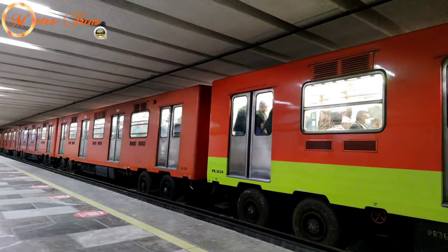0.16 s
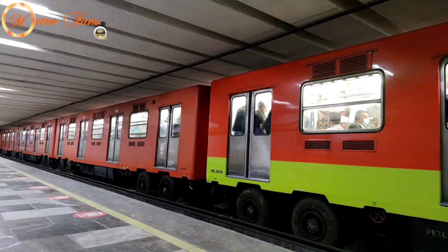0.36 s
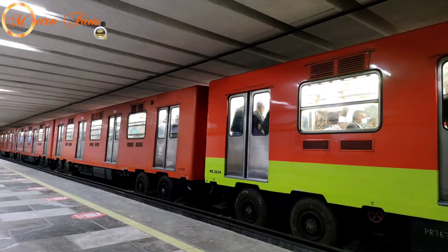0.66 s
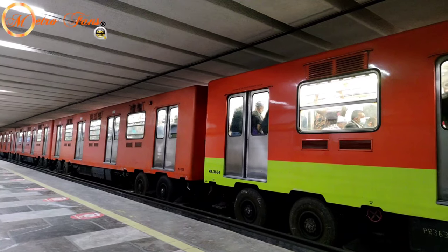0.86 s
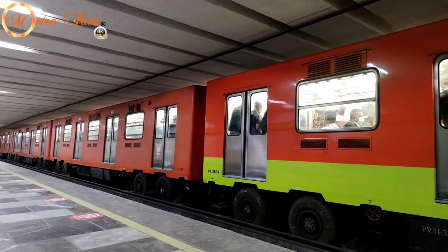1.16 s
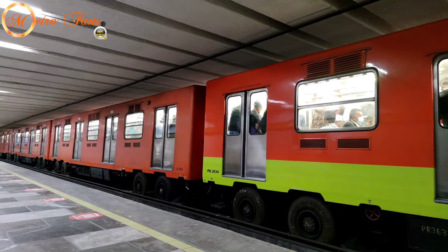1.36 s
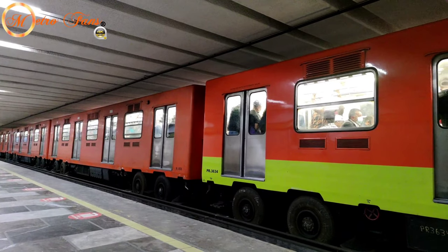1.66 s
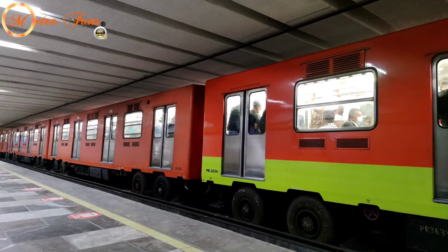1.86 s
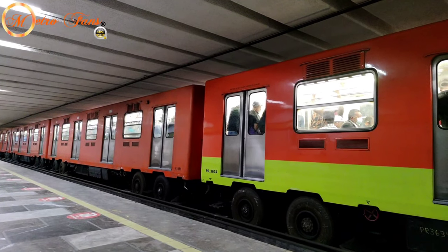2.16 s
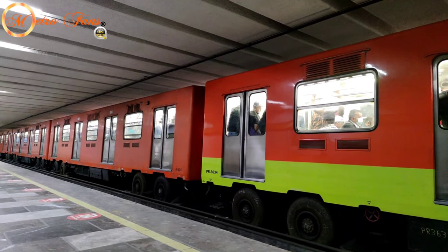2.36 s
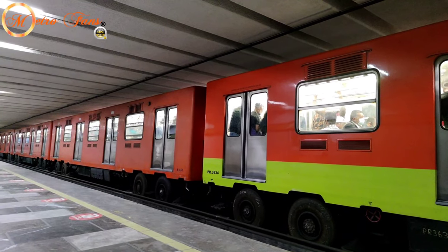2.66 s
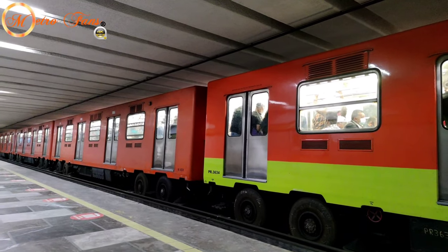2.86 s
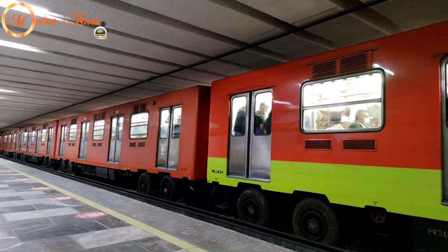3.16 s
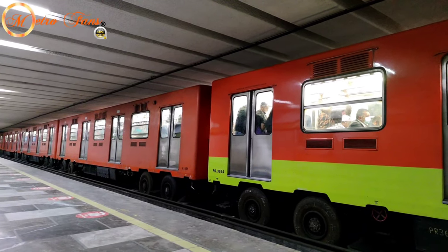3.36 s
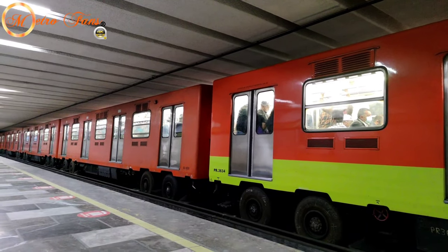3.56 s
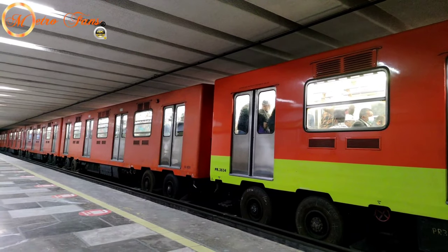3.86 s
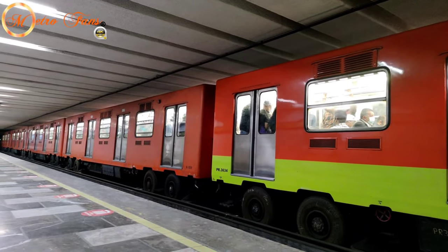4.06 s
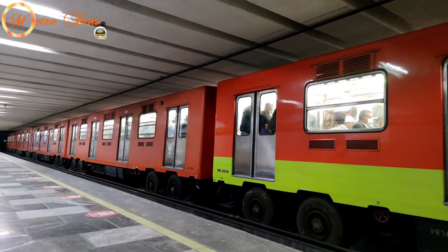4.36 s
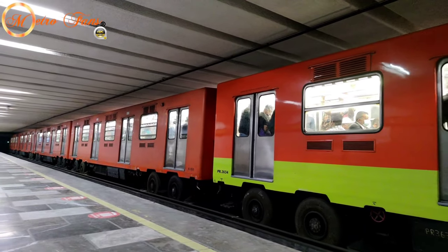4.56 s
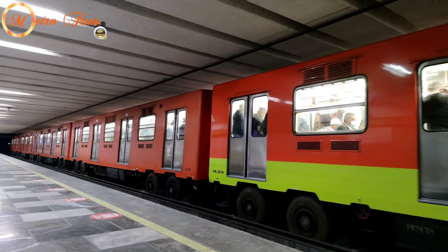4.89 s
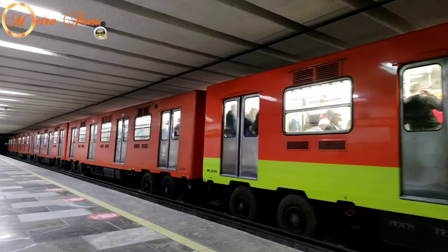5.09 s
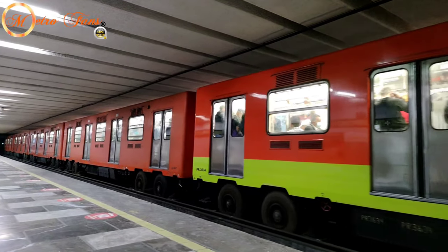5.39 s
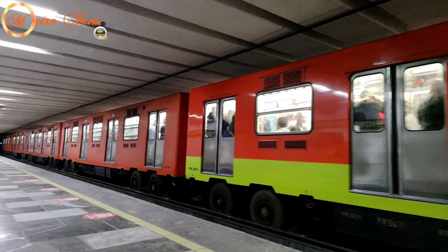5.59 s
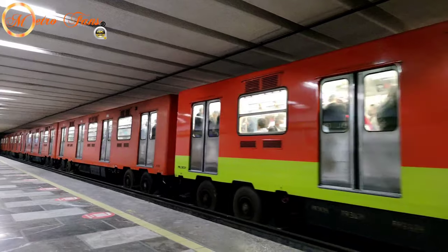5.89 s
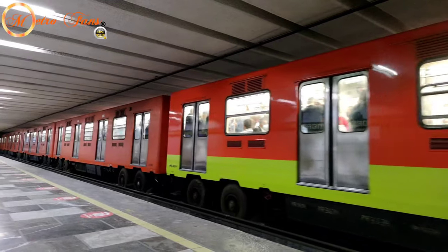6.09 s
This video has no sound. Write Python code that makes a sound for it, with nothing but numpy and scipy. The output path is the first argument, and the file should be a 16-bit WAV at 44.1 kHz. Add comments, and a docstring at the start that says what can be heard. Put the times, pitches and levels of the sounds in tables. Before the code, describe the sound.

First a short hiss of brake air dies away, leaving broad ventilation noise, wavering fans, a gently throbbing hum and a fixed electrical whine from a standing metro train. Then it pulls out past a stereo listener on the platform: the whine gets stronger and flutters left and right, while soft tyre rush and scraping collector shoes build under the reverberant vault, still rising at the end.

```python
"""The power converter of a rubber-tyred metro train whines on a fixed stack of harmonics, made of sine tones.
The train stands in a vaulted station, then pulls out past a listener on the platform; the whine swells
and beats against its own echoes. Tyres and collector shoes build to a rush of shaped noise, and motors hum.
Behind them, narrow noise bands make fan drones, broad noise makes the air, and tones beat as machine hums.
At the start a last hiss of air from the brakes, also noise, dies away."""
import sys
import numpy as np
from scipy import signal
from scipy.fft import rfft, irfft, next_fast_len
from scipy.io import wavfile
from scipy.ndimage import uniform_filter1d

SR = 44100
rng = np.random.default_rng(int(sys.argv[2]) if len(sys.argv) > 2 else 0)


def put_to_file(sound):
    """Save the sound as 16-bit audio at rate SR, in the file named by the first command-line argument."""
    columns = np.atleast_2d(sound).T  # one column per channel
    safe = np.clip(columns, -1, 1)
    whole_steps = np.round(safe * 32767)
    wavfile.write(sys.argv[1], SR, whole_steps.astype(np.int16))


N = 274743

EAR_LAG_S = .00041  # how much later sound along the platform reaches the left side than the right
CONTROL_STEP = 128  # samples between the points of slowly changing levels


def undb(db):
    """Decibels to gain."""
    return 10 ** (np.asarray(db) / 20)


def curve(table, column=1):
    """One column of a table whose rows start with seconds, joined by straight lines."""
    rows = np.array(table, float)
    return np.interp(np.arange(N) / SR, rows[:, 0], rows[:, column])


def unit(x):
    """Scale to an rms (average strength) of 1."""
    return x / np.sqrt(np.mean(np.abs(x) ** 2))


def pan(db):
    """Left and right gains that differ by so many dB but keep the total power equal."""
    gains = undb(np.array([[.5], [-.5]]) * db)
    return gains / np.sqrt(np.mean(gains ** 2, axis=0))


def walk(rate):
    """A random level that changes about rate times a second, smoothed twice, with rms 1."""
    hold = max(int(SR / rate), 2)
    steps = np.repeat(rng.standard_normal(N // hold + 1), hold)
    smooth = uniform_filter1d(uniform_filter1d(steps, hold), hold)
    return unit(smooth[:N])


def colour(points):
    """Gain at every frequency, from (Hz, dB) points; it falls away below the first point."""
    hz, db = np.transpose(points)
    f = np.fft.rfftfreq(next_fast_len(N), 1 / SR) + 1e-3
    return undb(np.interp(np.log(f), np.log(hz), db)) * np.minimum(f / hz[0], 1) ** 2


def hall_noise(gain, direct, likeness=0.78):
    """Stereo noise: a direct share runs along the platform, right side first; the rest comes from all round."""
    size = next_fast_len(N)
    f = np.fft.rfftfreq(size, 1 / SR)
    right, other = rfft(rng.standard_normal((2, size)))
    along_platform = direct * np.exp(-2j * np.pi * f * EAR_LAG_S)
    all_round = (1 - direct) * np.sinc(2 * f * EAR_LAG_S)
    # how much the two sides share at each frequency
    alike = likeness * (along_platform + all_round)
    left = alike * right + np.sqrt(1 - np.abs(alike) ** 2) * other
    return unit(irfft(np.array([left, right]) * gain, size)[:, :N])


def patchy(x, depth_db, changes_per_s=28, count=6):
    """Each octave of a noise flickers on its own, differently on the left and right."""
    size = next_fast_len(N)
    f = np.fft.rfftfreq(size, 1 / SR)
    octave = np.clip(np.log2(f / 280 + 1e-9), 0, count - 1)
    spectrum = rfft(x, size)
    out = 0
    for k in range(count):
        overlap = np.maximum(1 - np.abs(octave - k), 0)
        band = irfft(spectrum * overlap, size)[:, :N]
        flicker = np.array([walk(changes_per_s), walk(changes_per_s)])
        out = out + band * undb(depth_db * flicker)
    return out


def drone(hz, width_hz):
    """Noise in one narrow resonance, heard as a wavering tone."""
    f = np.fft.rfftfreq(next_fast_len(N), 1 / SR)
    return hall_noise(1 / (1 + ((f - hz) / width_hz * 2) ** 4), direct=0.94)


def tone(hz, gain):
    """A stereo sine under a slowly changing complex gain, which sets both its rms level and its phase."""
    places = np.linspace(0, N, gain.shape[1])
    n = np.arange(N)
    carrier = np.sqrt(2) * np.exp(2j * np.pi * (hz * n / SR + rng.random()))
    return np.array([(np.interp(n, places, side_gain) * carrier).real for side_gain in gain])


def draught(steps, size):
    """Moving air bends the sound paths: a slow stereo wobble of level and phase, smoothed over size steps."""
    chance = rng.standard_normal((2, steps + size - 1, 2)) @ [1, 1j]
    return unit(signal.fftconvolve(chance, np.hanning(size)[None], "valid"))


def standing_wave(pan_db, width):
    """A tone among its echoes: left and right differ in level and fall out of step (width 1 = opposed)."""
    half_turn = np.pi * np.clip(width, 0, 1)
    return pan(pan_db) * np.exp(1j * half_turn * np.array([[.5], [-.5]]))


# Spectrum of the ventilation air that fills the station. Each row: frequency in Hz, level in dB per Hz.
AIR = [(24, -20), (36, -19), (47, -14), (65, -11), (110, 0), (190, 0), (260, -7.5), (400, -6), (600, -7),
       (850, -13), (1300, -17), (2400, -22.5), (4000, -29), (7200, -33.5), (8600, -44), (14000, -46.5)]
# Wavering drones of fans and compressor. Each row: frequency in Hz, width in Hz, level in dB,
# left minus right in dB, change of level at 1 m/s and above in dB.
DRONES = [(353.7, 13.6, -46, -1, -8.5), (444, 11, -48.5, -2, -8), (529, 7.5, -51.5, -3, 3),
          (960, 5.5, -60, 18, 0), (1066, 8.3, -46, -0.5, -3), (1320, 5, -68, -7, 4)]
# A whistling fan, louder at first. Each row: time in seconds, level in dB.
WHISTLE = [(0, -42), (.45, -38), (.65, -48), (4, -45), (6.23, -60)]


def fans(speed, air_db=-29.5, air_patchy_db=.5):
    """Ventilation air rushes broadly and many machines drone; their balance shifts as the cars move."""
    out = undb(air_db) * patchy(hall_noise(colour(AIR), direct=0.23), air_patchy_db)
    moving = np.minimum(speed, 1) ** 2
    for hz, width_hz, db, pan_db, rolling_db in DRONES:
        level = undb(db + rolling_db * moving)
        out = out + level * pan(pan_db) * drone(hz, width_hz)
    whistle = undb(curve(WHISTLE)) * pan(-1.5) * drone(hz=886, width_hz=5.3)
    return out + whistle


# Pairs of machines that hum and beat. Each row: frequency of the stronger one in Hz, beats in Hz,
# time of a crest in seconds, its level at the start in dB, the weaker one relative to it in dB,
# left minus right in dB, rise in dB per second.
HUMS = [(27.8, 2.26, .9, -46.5, -4, 9, .8), (220.7, .63, .15, -40.5, -6, 0, 0),
        (441.2, 1.26, .15, -51, -10, -1, 0)]


def hums(waver=0.23):
    """Each pair of machines gives a steady hum that throbs at the difference of their speeds."""
    t = np.arange(0, N, CONTROL_STEP) / SR
    out = 0
    for hz, beat_hz, crest_s, db, weaker_db, pan_db, rise_db in HUMS:
        beat = 1 + undb(weaker_db) * np.exp(-2j * np.pi * beat_hz * (t - crest_s))
        wobble = waver * draught(len(t), size=256)
        out = out + tone(hz, undb(db + rise_db * t) * pan(pan_db) * (beat + wobble))
    return out


# Brief swells of the rumble. Each row: time of the peak in seconds, length in seconds, level in dB.
SURGES = [(.93, .45, -32), (3.026, 0.15, -38), (3.944, .3, -39), (4.39, .18, -37)]
# Spectrum of these swells. Each row: frequency in Hz, level in dB per Hz.
SURGE_SPECTRUM = [(24, 4), (34, 2), (50, -7), (75, 5), (125, 8), (200, 0), (270, -8), (370, 1), (550, -8),
                  (1200, -31.5), (4000, -70)]


def surges():
    """The station's rumble, a low noise, swells briefly and sinks back."""
    t = np.arange(N) / SR
    level = sum(undb(db) * np.exp(-(2 * (t - s) / length_s) ** 2) for s, length_s, db in SURGES)
    return level * hall_noise(colour(SURGE_SPECTRUM), direct=0.32)


# Spectrum of the brakes' hiss. Each row: frequency in Hz, level in dB per Hz.
BRAKE_AIR = [(1200, -3), (3000, 0), (5000, 2), (7500, 4), (9000, -8), (12000, -6.5), (14000, -18)]


def brake_air(level_db=-36, t60=0.28, tail_db=-45, tail_t60=1.0):
    """The released brakes' last hiss dies away under the vault, first fast, then slowly (t60: s to fall 60 dB)."""
    t = np.arange(N) / SR
    fade = undb(level_db - 60 * t / t60) + undb(tail_db - 60 * t / tail_t60)
    return fade * hall_noise(colour(BRAKE_AIR), direct=0.12)


# Brief rises of the rush. Each row: start in seconds, level in dB.
RUSH_BURSTS = [(4.968, -43), (5.265, -41), (5.341, -38), (5.425, -41), (5.907, -36)]
# Spectrum of these rises. Each row: frequency in Hz, level in dB per Hz.
BURST_SPECTRUM = [(1200, -14), (2200, 0), (3000, -2), (4500, -12), (9000, -30)]


def rush_bursts(attack_s=0.0054, t60=0.2):
    """Brief rises of the rush: noise that jumps up and fades (t60: s to fall 60 dB)."""
    t = np.arange(N) / SR
    level = 0
    for start_s, db in RUSH_BURSTS:
        attack = np.clip((t - start_s) / attack_s, 0, 1)
        level = level + attack * undb(db - 60 * np.maximum(t - start_s, 0) / t60)
    return level * hall_noise(colour(BURST_SPECTRUM), direct=.2)


# Spectra of the tyres and of the collector shoes. Each row: frequency in Hz, level in dB per Hz.
TYRES = [(60, -23), (160, 10), (300, 0), (600, -0.5), (1200, -1.5), (2000, 1.5), (2700, -3.5), (3700, -8),
         (8000, -30.5)]
SHOES = [(1500, -27), (3000, -6), (4000, 2), (5500, 1.5), (7400, -1.5), (8400, -12), (11000, -13),
         (14000, -28)]
# The rush of the tyres sags, then rises slightly. Each row: time in seconds, change of level in dB.
RUSH = [(4.8, 0), (5.08, -1), (5.22, -0.5), (5.3, 0), (5.45, .5), (5.56, 0), (5.8, 0.1), (6.03, .2),
        (6.23, 0.2)]


def running(speed, tyre_db=-34.0, tyre_power=0.97, shoe_db=-42.5, shoe_power=0.88, swell_db=0.6, chatter_db=1.0):
    """Tyres rush on the runways and shoes scrape the guide bars; base levels at 1 m/s grow as a power of speed."""
    tyre_level = speed ** tyre_power * undb(tyre_db + curve(RUSH) + swell_db * walk(16))
    tyres = tyre_level * hall_noise(colour(TYRES), direct=0.39)
    shoe_level = speed ** shoe_power * undb(shoe_db + chatter_db * walk(60))
    shoes = shoe_level * hall_noise(colour(SHOES), direct=0.036)
    return patchy(tyres + shoes, depth_db=1.05) + rush_bursts()


# The traction motors' hum. Each row: time in seconds, pitch in Hz, level in dB.
MOTOR_HUM = [(0, 441, -90), (4.2, 441, -62), (4.8, 440, -43), (5.2, 437, -43), (5.55, 436, -44),
             (5.8, 436, -42), (5.95, 436, -48), (6.23, 436, -49)]


def motors(pan_db=0, width=.15, waver=0.18):
    """The traction motors hum under load as the train gathers way, sagging a little in pitch."""
    hz, db = (curve(MOTOR_HUM, column)[::CONTROL_STEP] for column in (1, 2))
    # the sag is a growing lag in phase behind the first pitch
    turns = np.cumsum(hz - hz[0]) * CONTROL_STEP / SR
    wobble = 1 + waver * draught(len(hz), size=128)
    return tone(hz[0], undb(db) * standing_wave(pan_db, width) * wobble * np.exp(2j * np.pi * turns))


def travel(speed):
    """Metres covered since the start."""
    return np.cumsum(speed) / SR


def echoes(hz, metres, count=10, direct_near=0.12, direct_far=0.21, direct_fade_m=0.96):
    """Echoes from all directions slip against a tone's direct sound as its source travels, so it beats."""
    wavelength = 343 / hz  # speed of sound in m/s over frequency
    heading, arrival, start = rng.uniform(-1, 1, (3, count, 1))
    turns = heading * metres / wavelength + start
    field = []
    for side in (.5, -.5):
        side_turns = turns + side * arrival * hz * EAR_LAG_S
        field.append(np.exp(2j * np.pi * side_turns).sum(axis=0))
    # the share that arrives directly moves from near to far with the distance travelled
    share = direct_far + (direct_near - direct_far) * np.exp(-metres / direct_fade_m)
    return np.sqrt(share) + np.sqrt((1 - share) / count) * np.array(field)


CONVERTER_HZ = 120.77  # all harmonics are multiples of this
# The converter's lesser harmonics. Each row: multiple of CONVERTER_HZ, level standing in dB,
# level rolling in dB, left minus right standing in dB, stereo width standing from 0 to 1.
PARTIALS = [(1, -41, -43, 1, .1), (3, -55, -52, 4, .2), (4, -56, -61, -9, .5), (10, -58, -63, 8, .9),
            (11, -60, -55, -4, .85), (13, -54.5, -48.5, 7, .6), (14, -55, -59, 3, .9),
            (20, -56, -58, 8, .85), (21, -60, -54, 3, .15), (22, -53.5, -53, -7, .6),
            (23, -61, -56, -2, .25), (25, -53, -55.5, -2, .35), (26, -64, -60, 4, .5),
            (27, -63, -62, -1, .1), (28, -61.5, -68, -2, .1), (31, -62.5, -62, -9, .7),
            (39, -61, -65, 1, .15), (41, -63, -61, 9, .8), (47, -63, -65, 1, .1), (51, -65, -66, -2, .2),
            (59, -63, -67, -1, .1), (60, -62.5, -64, -3, .3), (72, -74, -81, -5, .5),
            (84, -67.5, -77, -2, .35), (114, -74, -78, 1, .1)]


def converter(speed, waver=0.12, drift=.16, buzz_db=-70.5, settle_m=0.1, step=256):
    """Harmonics of a fixed switching rate: steady at a stand, fluttering ever faster in their echoes on the move."""
    metres = travel(speed)[::step]
    moved = 1 - np.exp(-metres / settle_m)
    # a faint comb of high harmonics lies between the strong ones
    partials = {}
    for k in range(29, 65):
        if k not in WHINES:
            level_db = buzz_db + 2 * rng.standard_normal()
            partials[k] = [level_db, level_db, 3 * rng.standard_normal(), .3]
    partials.update({round(k): row for k, *row in PARTIALS})
    out = 0
    for k, (standing_db, rolling_db, pan_db, width) in partials.items():
        hz = k * CONVERTER_HZ
        wobble = 1 + waver * draught(len(metres), size=128) + drift * draught(len(metres), size=1024)
        standing = undb(standing_db) * standing_wave(pan_db, width) * wobble
        rolling = undb(rolling_db) * echoes(hz, metres)
        out = out + tone(hz, np.sqrt(1 - moved) * standing + np.sqrt(moved) * rolling)
    return out


# The leading harmonics swell and dip against their echoes; each multiple of CONVERTER_HZ has its own rows.
# Each row: time in seconds, level in dB, left minus right in dB, stereo width from 0 to 1.
WHINES = {12: [(0, -44, -12, .75), (1.3, -43.5, -12, .8), (2.4, -44.7, -8, .58), (3.7, -46, -4, .7),
          (4.25, -45, 1, .7), (4.42, -39.5, 3, .55), (4.55, -35.5, 2, .6), (4.75, -36, 9, .75),
          (4.82, -35, 18, .2), (4.9, -34.7, 10, .1), (5.03, -44, -6, .5), (5.15, -38, -12, .25),
          (5.24, -36, -9, .58), (5.3, -38, -4, .9), (5.39, -45, -5, .4), (5.45, -49, 0, .6),
          (5.55, -33.5, 8, .95), (5.66, -47, 0, .9), (5.73, -38.5, 0, .4), (5.85, -40.5, 4, .2),
          (5.9, -44, -1, .5), (5.96, -37.5, 0, .35), (6.01, -35.5, 2, .3), (6.06, -46, -2, .95),
          (6.16, -37.5, -1, .9), (6.23, -43, -4, .95)], 18: [(0, -63.5, 0, 0.1), (4.1, -59.0, -5, 0.1),
          (4.35, -48.0, -2, 0.2), (4.58, -45.5, -12, 0.1), (4.72, -44.5, -5, 0.2), (4.9, -49.5, -1, 0.1),
          (5.0, -47.5, -3, 0.2), (5.25, -47.0, -8, 0.8), (5.5, -47.5, -5, 0.5), (6.23, -44.5, 6, 0.7)],
          24: [(0, -63, -5, .4), (2.3, -58.5, -1, .1), (3.4, -50, 1, .25), (3.8, -51, 2, .25),
          (4.15, -55.5, 3, .3), (4.33, -46.5, 1, .25), (4.58, -44, 11, .7), (4.75, -45, 2, .2),
          (4.9, -52, 1, .9), (5.02, -46, -9, .8), (5.15, -56, -5, .4), (5.29, -42.5, -5, .4),
          (5.38, -48, -4, .4), (5.62, -51, -1, .2), (5.77, -42.5, 6, .8), (6.23, -46, -2, .8)],
          30: [(0, -52.5, -1, .1), (.45, -54, -1, .1), (1.1, -51, -2, .1), (1.9, -50.3, -2, .1),
          (3, -54.5, -2, .1), (4.32, -52, 0, 0), (4.37, -62, -4, .3), (4.47, -61, -4, .3),
          (4.52, -50, 2, 0), (4.63, -50, 2, 0), (4.72, -58, 6, .4), (4.9, -53, -2, 0), (5.27, -49, 3, .2),
          (5.32, -60, -1, .8), (6.23, -53, 0, .1)], 36: [(0, -49.5, -1, .7), (1.8, -51.5, -8, .6),
          (2.5, -49.5, -7, .55), (3.3, -48.5, -6, .6), (4.1, -51, -5, .8), (4.55, -61, 3, .2),
          (4.8, -55, 2, .2), (6.23, -60, -3, .5)], 42: [(0, -55, -4, .2), (1.3, -54, -3, .3),
          (2, -55.5, -2, .4), (2.8, -58.5, 0, .4), (3.6, -58, 12, .3), (4.3, -55.5, 7, .9),
          (4.6, -61, -1, .8), (5, -54, -5, .2), (5.3, -63, 0, .5), (6.23, -60, 0, .5)]}


def whine(speed, smear=0.35, waver_db=1.45):
    """The leading harmonics hold at a stand, then throb and swing left and right as echoes bend their phase."""
    out = 0
    for k, rows in WHINES.items():
        db, pan_db, width = (curve(rows, column)[::CONTROL_STEP] for column in (1, 2, 3))
        left_bend, right_bend, waver = np.array([walk(13), walk(9), walk(8)])[:, ::CONTROL_STEP]
        # smear: radians of bend at 1 m/s
        bend = smear * speed[::CONTROL_STEP] * np.array([left_bend, right_bend])
        level = undb(db + waver_db * waver)
        out = out + tone(k * CONVERTER_HZ, level * standing_wave(pan_db, width) * np.exp(1j * bend))
    return out


# The train's motion. Each row: time in seconds, speed in m/s.
SPEED = [(0, 0), (4.0, 0), (4.4, .3), (5.2, 1.05), (6.0, 1.85), (6.23, 2.0)]


def scene():
    """All sources together, the moving ones driven by the train's speed."""
    speed = np.maximum(curve(SPEED), 0)
    background = fans(speed) + hums() + surges()
    train = brake_air() + running(speed) + motors() + converter(speed) + whine(speed)
    return background + train


def record(dry, top_hz=14200):
    """A steep low-pass filter cuts the highest treble."""
    return signal.sosfilt(signal.ellip(10, .2, 80, top_hz, fs=SR, output="sos"), dry)


dry = scene()
out = record(dry)
put_to_file(out)
```